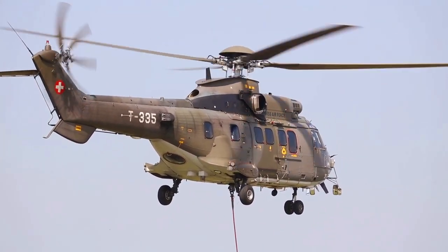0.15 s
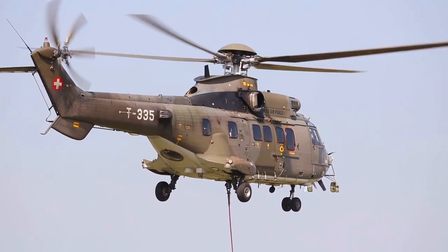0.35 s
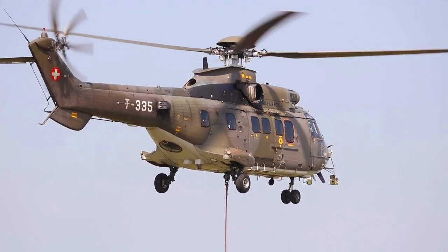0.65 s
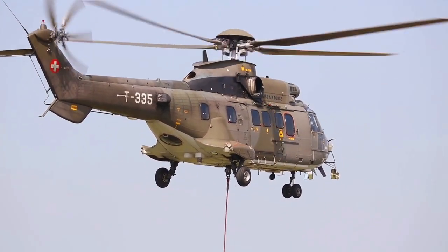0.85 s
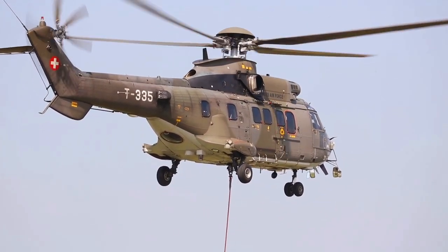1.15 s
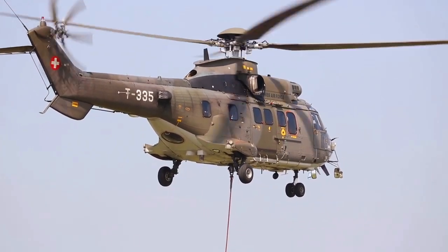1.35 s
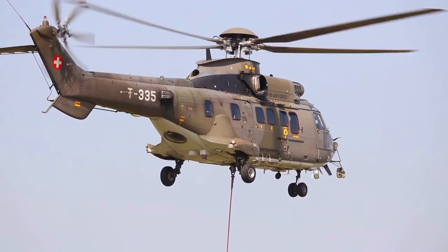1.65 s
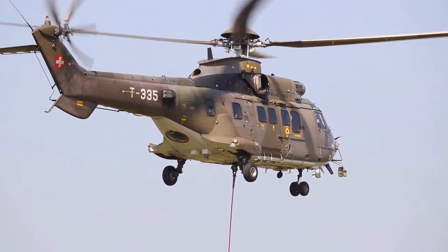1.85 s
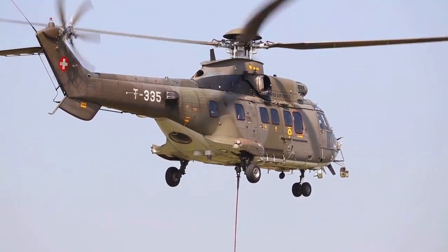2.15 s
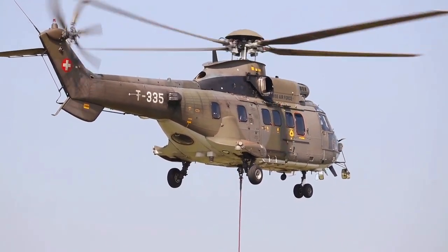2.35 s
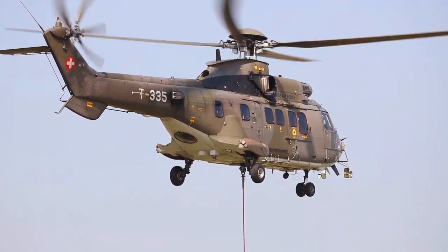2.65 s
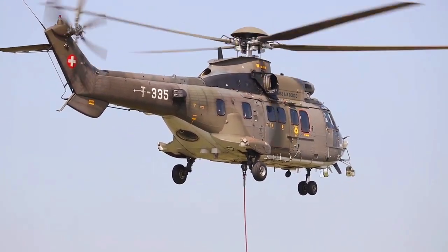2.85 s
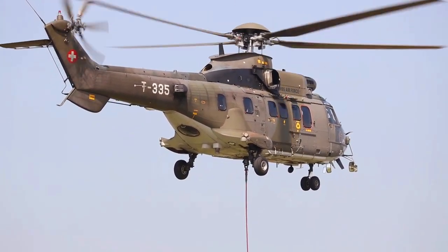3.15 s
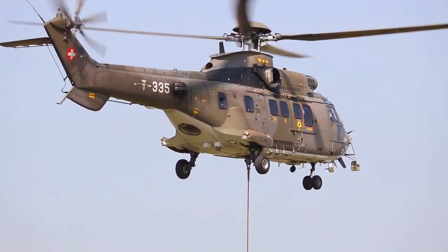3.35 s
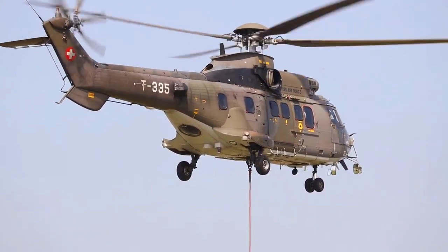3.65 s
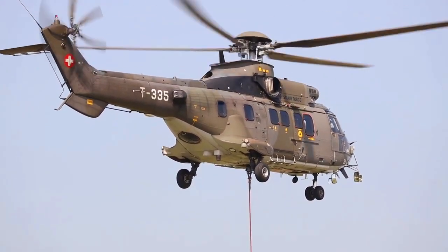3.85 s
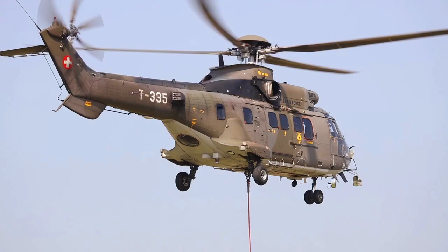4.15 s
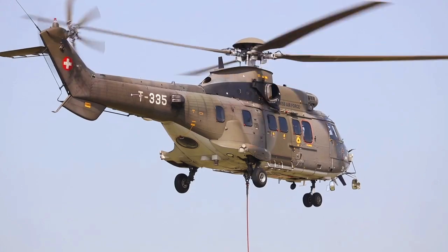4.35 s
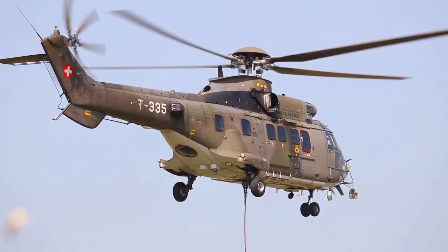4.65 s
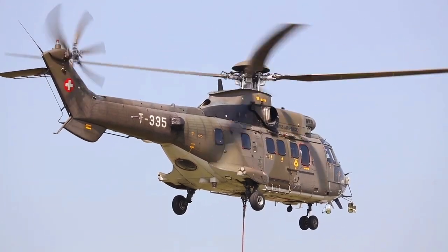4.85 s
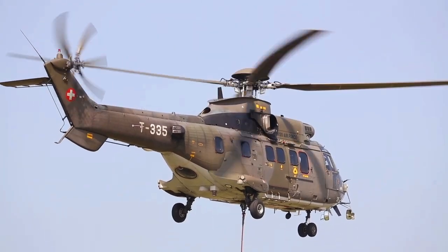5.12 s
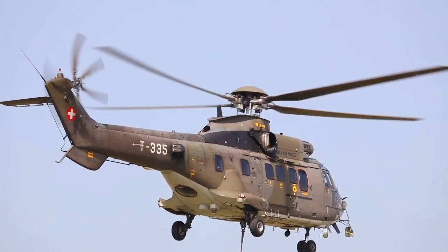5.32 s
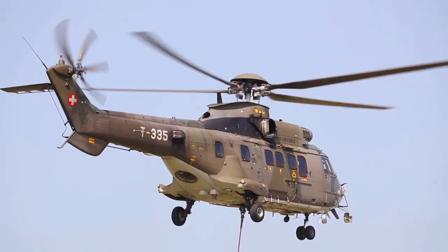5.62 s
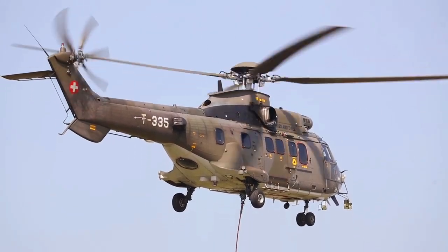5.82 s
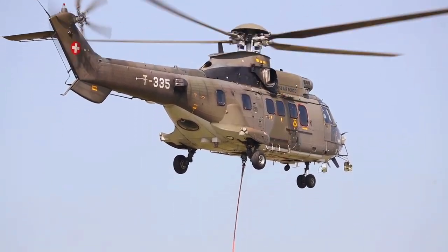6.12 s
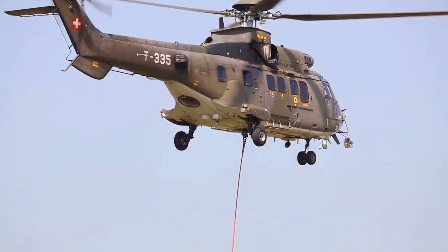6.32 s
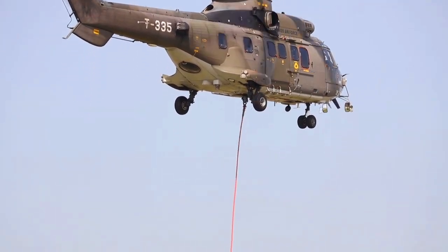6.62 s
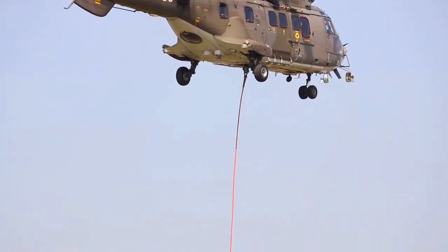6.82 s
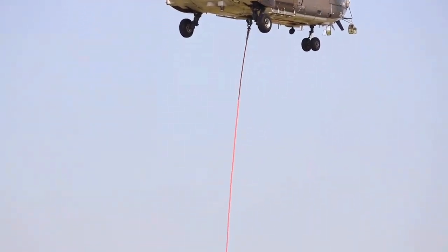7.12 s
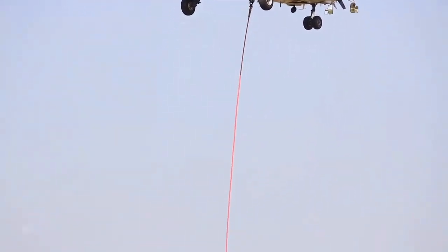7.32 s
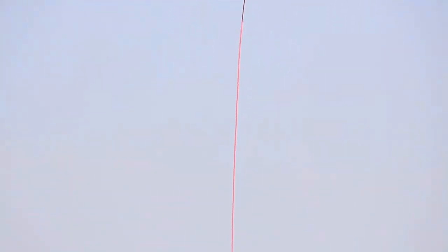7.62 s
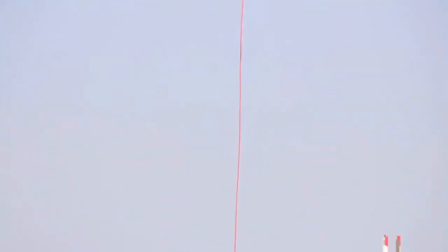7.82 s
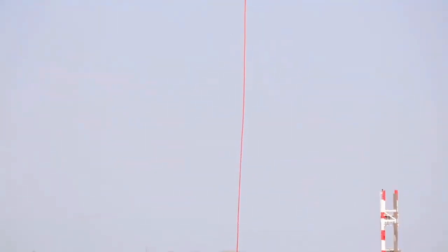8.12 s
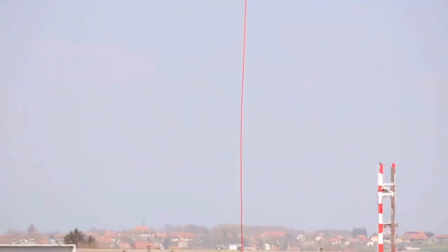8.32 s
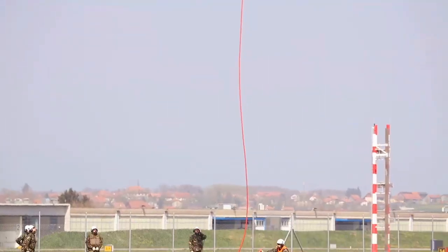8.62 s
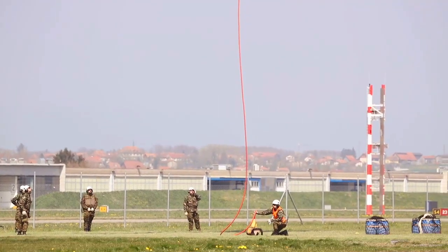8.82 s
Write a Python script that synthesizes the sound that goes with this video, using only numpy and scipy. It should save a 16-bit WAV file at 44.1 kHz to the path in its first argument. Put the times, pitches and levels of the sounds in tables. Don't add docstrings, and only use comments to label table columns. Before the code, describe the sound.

A big twin-turbine helicopter hovers over an airfield, loud from start to finish without approaching or leaving. A dense roar with raspy mids and hiss pulses at about 17 to 18 blade passes a second, while the tail rotor chops it into a rough buzz with a low hum, stronger in the first four seconds. From 0 to 4 s wind gusts thud and flutter on the microphone, with isolated slaps, several around 2 to 2.6 s. From 4.3 to 5.4 s blade slaps come in rapid hard runs, and the heaviest gust bursts at 5.4 s. Thin high turbine whine rises around 5.6 to 7 s. More slaps crack at 6.6 to 6.9 s with a bright whoosh. About 7 to 8.3 s is smoother and less windy, with brief airy whooshes and stray slaps; rapid slapping returns from 8.45 s to the abrupt end. Mono, softly clipped, treble grainy.

```python
import sys
import numpy as np
from scipy import signal
from scipy.fft import rfft, irfft, next_fast_len
from scipy.io import wavfile
from scipy.ndimage import uniform_filter1d, map_coordinates

SR = 44100
rng = np.random.default_rng(int(sys.argv[2]) if len(sys.argv) > 2 else 0)


def elevation(decibels):
    levels = np.asarray(decibels, float)
    return 10 ** (levels / 20)


def store_wav(level_fs):
    pcm = np.round(np.clip(np.atleast_2d(level_fs), -1, 1) * 32767)
    wavfile.write(sys.argv[1], SR, pcm.T.astype(np.int16))


N = 395577
BLADE_HZ, TAIL_HZ = 17.55, 106


def unit(x):
    return x / np.sqrt(np.mean(x ** 2) + 1e-20)


def curves(rows):
    s, *columns = np.transpose(rows)
    return [np.interp(np.arange(N) / SR, s, column) for column in columns]


def wobble(rate):
    knots = rng.standard_normal(int(N * rate / SR) + 4)
    return map_coordinates(knots, [np.arange(N) * rate / SR])


def filtered(x, response):
    m = next_fast_len(N + 8192)
    return irfft(rfft(x, m) * response(np.fft.rfftfreq(m, 1 / SR)), m)[:N]


def coloured(x, points):
    f, db = np.transpose(points)
    return filtered(x, lambda hz: elevation(np.interp(np.log(hz + 1), np.log(f + 1), db, -120, -120)))


def rush(spectrum, patchy_db):
    z = signal.stft(rng.standard_normal(N), nperseg=512)[2]
    field = uniform_filter1d(rng.standard_normal(z.shape), 5, 0)
    field = uniform_filter1d(field, 12, 1)
    patchy = signal.istft(z * elevation(patchy_db * unit(field)), nperseg=512)[1][:N]
    return unit(coloured(patchy, spectrum))


def narrow(hz, width_hz):
    return unit(filtered(rng.standard_normal(N), lambda f: 1 / (1 + (2 * (f - hz) / width_hz) ** 2)))


def chop(rate_hz, lag, share, sharp):
    passes = rate_hz * np.arange(N) / SR - lag
    puff = np.exp(sharp * np.cos(2 * np.pi * passes)) / np.i0(sharp)
    share = np.clip(share, 0, .95)
    return np.sqrt(1 - share + share * puff)


def wind():
    # start_s, rumble_db
    breeze_rows = [(0, -31.5), (1.9, -26), (4.4, -27.5), (4.8, -22.5), (5.3, -25.5), (5.6, -19),
                   (5.72, -24), (7, -26), (7.6, -29.5), (8.5, -28), (8.97, -29)]
    # start_s, length_s, rumble_db, flutter_db over the rumble
    gust_rows = [(.0, .08, -23, 4), (0.141, 0.11, -18.5, -3), (0.274, .2, -15.5, -2.5),
                 (0.478, .35, -19.5, -3), (0.828, 0.29, -23, -2.5), (1.217, .12, -24, -2),
                 (1.54, .06, -18.5, -10), (1.951, 0.23, -23.5, 0.5), (2.122, .21, -19, -2),
                 (2.406, .1, -12.5, -0.5), (2.499, 0.095, -10.5, -3.5), (2.628, 0.16, -18, -4),
                 (2.84, .3, -16, -2.5), (3.3, .2, -20.5, -4.5), (3.578, .06, -20.5, -12),
                 (3.722, 0.081, -15.5, -4.5), (3.847, 0.098, -15, -1.5), (4, 0.037, -13.5, -4),
                 (4.041, .12, -21, -7), (4.334, 0.043, -21, -4), (5.33, .025, -9, -4),
                 (5.374, 0.064, -4.5, -1), (5.471, .06, -13, -0.5), (5.74, .2, -17.5, 3.5),
                 (5.946, .22, -16, -5), (6.252, .075, -12, -6.5), (6.404, .28, -14.5, -4),
                 (6.822, .04, -16.5, -1.5), (6.872, .035, -12.5, -2), (6.96, .4, -25, 0)]
    # pitch_hz, level_db per Hz
    rumble_spectrum = [(12, -57), (20, -25.5), (50, -16.5), (110, -4.5), (180, -2), (260, -1), (330, -44.5)]
    # pitch_hz, level_db per Hz
    flutter_spectrum = [(200, -25), (270, -4), (350, -2), (450, -9.5), (650, -14), (900, -26), (1300, -39)]
    sag_db, rise_s, fall_s = 1.5, .008, .02
    breeze_flutter_db = -2

    t = np.arange(0, N, 32) / SR
    deep = elevation(curves(breeze_rows)[0][::32]) ** 2
    edge = deep * elevation(breeze_flutter_db) ** 2
    for s, length, db, flutter_db in gust_rows:
        progress = np.clip((t - s) / length, 0, 1)
        rise = 1 + np.tanh((t - s) / rise_s)
        fall = 1 - np.tanh((t - s - length) / fall_s)
        gust = elevation(db - sag_db * (progress - .5)) ** 2 * rise * fall / 4
        deep = deep + gust
        edge = edge + gust * elevation(flutter_db) ** 2
    deep, edge = curves(np.transpose([t, deep, edge]))
    lumps = elevation(1.47 * wobble(35) + .7 * wobble(18))
    rumble = unit(lumps * rush(rumble_spectrum, patchy_db=1.0))
    flutter = unit(lumps * rush(flutter_spectrum, patchy_db=2.0))
    return elevation(-3.0) * (np.sqrt(deep) * rumble + np.sqrt(edge) * elevation(0.6) * flutter)


def turbines():
    # start_s, facing_db
    facing_rows = [(0, 2), (.5, 5), (1, -1), (2, -7.5), (3.2, -5), (3.47, 4.5), (3.8, -2.5), (5, -3.5),
                   (5.6, 9), (6.1, 10.5), (7, 6), (8, -3), (8.97, 2)]
    facing_db = curves(facing_rows)[0]
    first = elevation(-61.5 + .9 * facing_db) * narrow(9375, 100)
    second = elevation(-59.5 + .24 * facing_db) * narrow(9570, 200)
    intake = elevation(-57.5 + .8 * facing_db + 1.5 * wobble(9)) * narrow(4220, 220)
    return first + second + intake


def tail_hum():
    # start_s, second_order_db
    hum_rows = [(0, -30), (.45, -22.5), (1.3, -26.5), (1.45, -34), (2.1, -29), (2.35, -29.5), (2.57, -18.5),
                (2.6, -31.5), (2.66, -20), (3.1, -26), (3.4, -24), (3.65, -25), (4.2, -35), (5.2, -35.5),
                (5.8, -43), (6.5, -31), (7, -38.5), (8.97, -43)]
    turn = 2 * np.pi * (TAIL_HZ * np.arange(N) / SR + .1 * wobble(4) + .035 * wobble(16))
    orders = np.sqrt(2) * np.sin(2 * turn) + elevation(-8) * np.sin(turn)
    orders = elevation(2.1 * wobble(16)) * orders
    return elevation(curves(hum_rows)[0]) * (orders + elevation(-6) * narrow(343, 18))


def whooshes():
    # start_s (the peak), pitch_hz, length_s, level_db rms
    eddies = [
        (0.65, 2500, 0.11, -40),
        (0.75, 2650, 0.078, -32.5),
        (2.3, 2300, 0.14, -33),
        (4.68, 2080, 0.15, -32.5),
        (4.42, 970, 0.37, -33),
        (6.8, 2050, 0.14, -27),
        (7.55, 2500, 0.11, -29.5),
        (8.1, 3200, 0.083, -38),
        (7.65, 580, 0.38, -34),
    ]
    t = np.arange(N) / SR
    return sum(elevation(db) * np.exp(-((t - s) / length) ** 2) * narrow(hz, 60 + hz / 5)
               for s, hz, length, db in eddies)


def slap_list():
    # first_s, last_s, first_db, last_db, thump_db
    runs = [(4.299, 4.412, -15, -5, -6), (4.466, 4.581, -1.5, -8.5, -6), (4.638, 4.812, -2, -10.5, -7),
            (4.866, 4.981, -7.5, -4.5, -16), (5.041, 5.266, -11, -10.5, -11), (5.323, 5.44, -6, -6.5, -0.5),
            (6.574, 6.693, -10, -3, -15), (6.752, 6.922, -5.5, -3.5, -17), (8.451, 8.563, -8, -10, -14),
            (8.623, 8.734, -4.5, -5, -9), (8.794, 8.962, -6.5, -5, -15)]
    # start_s, peak_db, thump_db
    strays = [(.309, -10, -14), (.759, -10, -3), (1.815, -8, -9.5), (2.013, -5.5, -29), (2.171, -8.5, -11),
              (2.412, -9.5, -2), (2.525, -18.5, -3.5), (2.581, -3.5, -6.5), (3.76, -12.5, 2.5),
              (4.155, -14.5, -8), (5.353, -7, -14), (5.762, -12, 3), (5.868, -12.5, -12.5),
              (6.206, -11.5, -17), (6.261, -7.5, 3), (7.399, -13.5, -5.5), (7.564, -7, -17),
              (7.75, -13.5, -2.5), (7.8, -12.5, 1)]
    rows = []
    for first, last, db, last_db, thump_db in runs:
        count = round((last - first) * BLADE_HZ) + 1
        rows.append(np.linspace([first, db, thump_db], [last, last_db, thump_db], count))
    return np.concatenate(rows + [strays])


def slap_shape(u):
    swell = .5 * np.exp(u / .0028)
    trail = 1.0 * np.exp(-u / .0045) + .12 * np.exp(-u / 0.012)
    return np.where(u < 0, swell, trail)


def slaps():
    # pitch_hz, level_db
    body_spectrum = [(250, -24.5), (600, -9), (1200, -0.5), (2200, -2), (3500, -17.5), (6000, -35)]
    spread = .45
    crack_db, size_scatter_db, colour_scatter_db = -18.5, 0.5, 2.5

    t = np.arange(-600, 1200) / SR
    layers, rows = np.zeros((3, N + 2000)), slap_list()
    noises = rng.standard_normal((len(rows), 3, len(t) + 1))
    for (s, db, thump_db), noise in zip(rows, noises):
        size, dull, sharp = noise[:, -1] * [size_scatter_db, colour_scatter_db, colour_scatter_db]
        stretch = np.clip(elevation(spread * (thump_db + 13.5)), .7, 1.8)
        burst = slap_shape(t / stretch) * noise[:, :-1]
        burst /= np.linalg.norm(burst, axis=1)[:, None]
        burst[:, 670] -= .35
        colour_db = np.array([[0], [thump_db + dull], [crack_db + sharp]])
        start = round(s * SR) - 540
        layers[:, start:start + len(t)] += elevation(db + size + colour_db) * burst
    body, thump, crack = layers[:, :N]
    low = coloured(thump, [(300, -32.5), (650, 8.5), (1000, -16.5)])
    high = coloured(crack, [(2200, -22.5), (3200, 3.0), (6500, -21.5), (9000, -33)])
    return elevation(23.5) * coloured(body, body_spectrum) + elevation(29.5) * low + elevation(22) * high


def drone_levels():
    # start_s, loudness_db, treble_db over the loudness
    loudness_rows = [(0.0, -24.5, -15), (0.22, -26, -16.5), (0.47, -23, -14.5), (0.55, -25.5, -14.5),
                     (1.72, -25.5, -14), (2.25, -20, -20), (2.35, -26, -15), (2.57, -19, -20.5),
                     (2.67, -24.5, -14.5), (4.75, -23, -15.5), (5.2, -27.5, -14), (5.4, -20, -19.5),
                     (5.52, -20.5, -16.5), (6.97, -21, -15), (8.14, -26, -11.5), (8.62, -24, -12.5),
                     (8.92, -20, -19), (8.97, -25, -10)]
    # start_s (the peak), length_s, lift_db
    clear_moments = [(0.49, .1, 3.5), (0.809, .09, 5), (1.05, 0.12, -2.5), (1.427, 0.11, 2),
                     (1.925, 0.13, 4), (3.038, 0.096, 3), (3.51, 0.1, 4), (5.751, 0.19, 2), (7.09, 0.12, 0),
                     (4.067, .05, 2.5), (4.566, .12, 4), (7.613, 0.033, 3), (8.072, .06, 3),
                     (8.296, 0.023, 4.5), (8.395, .04, 4.5), (8.686, 0.022, 6), (8.739, 0.017, 6)]
    loud_db, treble_db = curves(loudness_rows)
    t = np.arange(0, N, 64) / SR
    lift_db = sum(db * np.exp(-((t - s) / length) ** 2) for s, length, db in clear_moments)
    treble_db = treble_db + curves(np.transpose([t, lift_db]))[0]
    roar_db = loud_db + .5
    rasp_db = loud_db - 6 + .6 * (treble_db - treble_db.mean())
    hiss_db = loud_db + treble_db - 0.72
    return roar_db, rasp_db, hiss_db


def drone():
    # start_s, lag in blade passes, swish_depth 0-1
    blade_rows = [(0, 0.42, .2), (1, .42, 0.2), (2, 0.41, 0.3), (3, 0.43, 0.15), (4.2, 0.5, 0.25),
                  (4.5, 0.49, 0.75), (5, 0.6, 0.5), (5.5, 0.4, 0.44), (6.2, 0.46, 0.2), (6.5, 0.28, 0.54),
                  (6.9, 0.54, 0), (7.2, 0.86, 0.08), (7.6, 1, .2), (8.1, 1, .05), (8.4, 0.36, 0.35),
                  (8.97, 0.4, 0.5)]
    # start_s, chop_depth 0-1
    tail_rows = [(0, .3), (.55, .75), (1.05, .15), (1.75, .55), (2.7, .08), (3.5, 0.4), (4.2, .4), (5, .12),
                 (5.55, .8), (6.4, .3), (6.8, .6), (7.7, 0.4), (8, 0.4), (8.5, 0.6), (8.97, 0.4)]
    # pitch_hz, level_db per Hz
    roar_spectrum = [(24, -58.5), (40, -8), (144, -4.5), (222, -5.5), (288, -13), (418, -9.5), (465, -4),
                     (527, -8), (685, -5), (1600, -11.5), (2080, -45), (3520, -120)]
    rasp_spectrum = [(820, -25.5), (1400, 0), (1970, 1.5), (2230, -0.5), (3070, -4.5), (3700, -19),
                     (4810, -49.5), (8140, -120)]
    hiss_spectrum = [(1940, -21), (3300, 3.5), (4250, 0.5), (4880, -4.5), (6500, -7.5), (8000, -11.5),
                     (8900, -14), (9700, -21), (10600, -24.5), (12000, -60.5)]
    # pitch_hz, width_hz, level_db rms
    resonances = [(1259, 13, -38), (1231, 200, -34.5), (1689, 57, -38.5), (658, 75, -36), (2090, 92, -45.5),
                  (8040, 180, -60)]

    roar_db, rasp_db, hiss_db = drone_levels()
    lag, depth = curves(blade_rows)
    tail_lag = .25 * wobble(3)
    tail_depth = curves(tail_rows)[0]
    air = wobble(11)

    def swish(part):
        return chop(BLADE_HZ, lag, part * depth, sharp=3.2)

    def buzz(part):
        return chop(TAIL_HZ, tail_lag, part * tail_depth * elevation(1.9 * wobble(20)), sharp=2.1)

    roar = elevation(roar_db + 1.0 * air) * swish(0.86) * buzz(.55) * rush(roar_spectrum, patchy_db=1.5)
    rasp = elevation(rasp_db + .9 * air) * swish(0.68) * buzz(0.77) * rush(rasp_spectrum, patchy_db=1.5)
    hiss = elevation(hiss_db + 0.38 * air) * swish(0.2) * buzz(.8) * rush(hiss_spectrum, patchy_db=1.3)
    bright = swish(0.8) * buzz(0.41) * whooshes()
    gears = sum(elevation(db) * narrow(hz, width) for hz, width, db in resonances)
    gears = gears * elevation(0.67 * (roar_db - roar_db.mean())) * swish(0.62)
    return roar + rasp + hiss + bright + gears


def ground(x):
    # start_s, near_share 0-1, far_share 0-1
    echo_rows = [(0, 0.18, 0.06), (.6, 0.4, 0.02), (1.85, 0.75, 0.01), (2.1, 0.3, 0), (3.2, 0.08, 0),
                 (3.5, .05, 0.35), (3.8, .05, .05), (4.4, 0, 0.2), (5.1, 0.04, 0.2), (5.5, 0.04, 0),
                 (7, 0.05, 0.11), (8, 0.1, 0.07), (8.97, 0.08, 0)]
    near, far = curves(echo_rows)

    def late(delay_s, top_hz):
        return filtered(x, lambda hz: np.exp(-2j * np.pi * hz * delay_s - (hz / top_hz) ** 4))

    x = filtered(x, lambda hz: 1 / np.sqrt(1 + (75 / (hz + 1)) ** 4))
    echoed = x - near * late(0.00126, 1250) - far * late(0.00201, 2600)
    return echoed / np.sqrt(1 + .5 * (near ** 2 + far ** 2))


def scene():
    return (ground(drone() + slaps()) + tail_hum() + turbines() + wind())[None]


def starved(x, size=1024, offset=762):
    # pitch_hz, step_db over the usual size of a line
    step_rows = [(3000, -16), (5500, -4), (7000, 2), (8600, 6), (9100, 7.5), (9500, 4), (9750, 7),
                 (9950, 13), (10300, 16), (10600, 20)]
    n, k = np.arange(2 * size), np.arange(size)
    window = np.sin(np.pi * (n + .5) / (2 * size))[:, None]
    basis = window * np.cos(np.pi / size * np.outer(n + .5 + size / 2, k + .5))
    basis = basis.astype(np.float32)
    padded = np.pad(x, (2 * size - offset, 3 * size)).astype(np.float32)
    count = len(padded) // size - 1
    lines = padded[np.arange(count)[:, None] * size + n] @ basis
    hz, db = np.transpose(step_rows)
    usual = uniform_filter1d(np.median(np.abs(lines), 0), 15)
    step = usual * 1.5 * elevation(np.interp(k * SR / (2 * size), hz, db)) + 1e-9
    treble = np.median(np.abs(lines[:, 300:430]), 1)[:, None]
    step = step * np.clip(treble / np.median(treble), .5, 2) ** .6
    rounded = np.round(.9 * lines / step) * step / .9
    frames = rounded.astype(np.float32) @ basis.T * 2 / size
    joined = np.append(frames[:, :size], np.zeros((1, size)), 0)
    joined[1:] += frames[:, size:]
    return joined.ravel()[2 * size - offset:][:N]


def roll_off(x):
    return signal.sosfilt(signal.butter(12, 10610, fs=SR, output="sos"), x)


def record(dry):
    clipped = dry / (1 + np.abs(dry) ** 8) ** (1 / 8)
    thinned = starved(clipped[0], size=1024, offset=762)[None]
    return roll_off(thinned)


dry = scene()
out = record(dry)
store_wav(out)
```